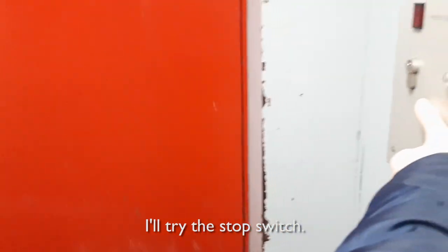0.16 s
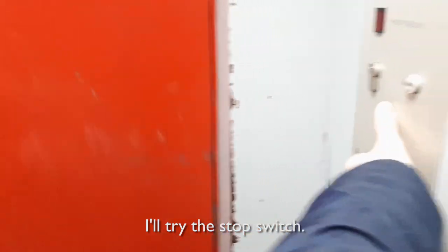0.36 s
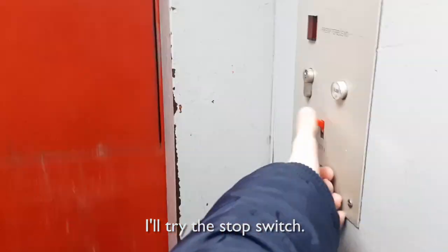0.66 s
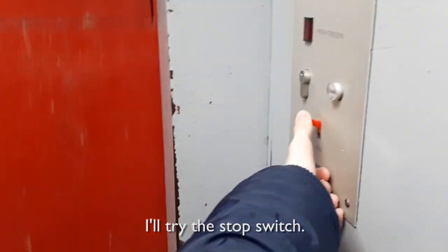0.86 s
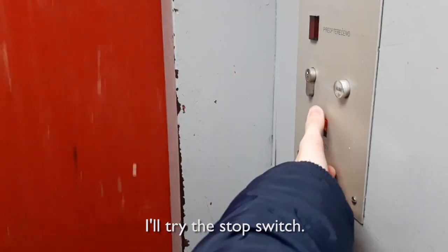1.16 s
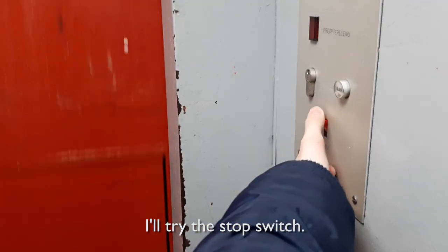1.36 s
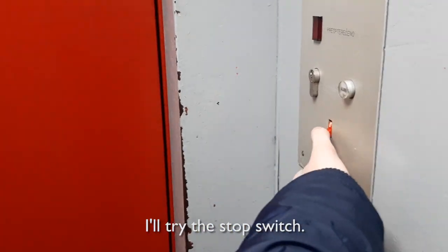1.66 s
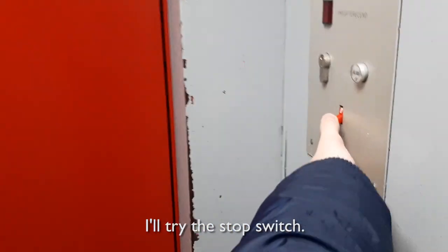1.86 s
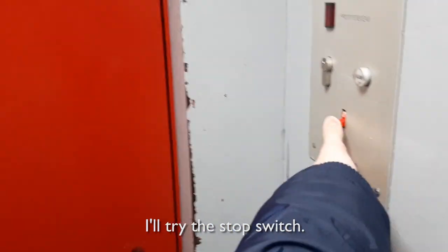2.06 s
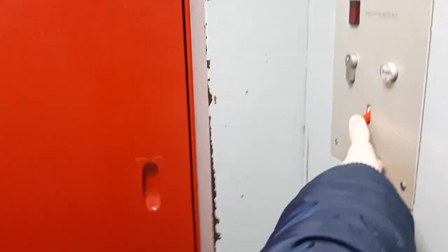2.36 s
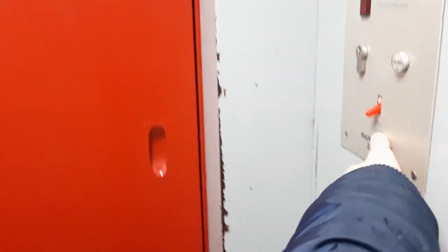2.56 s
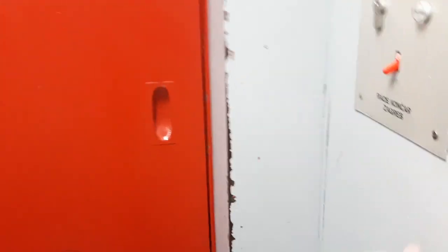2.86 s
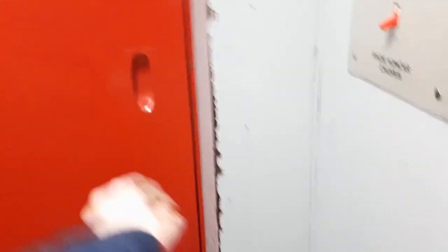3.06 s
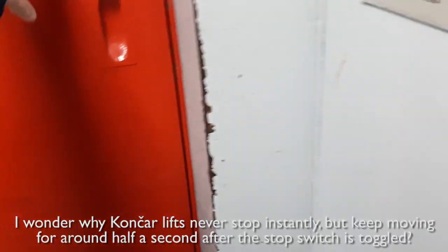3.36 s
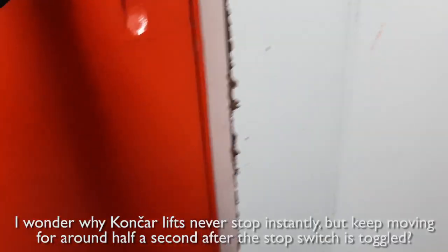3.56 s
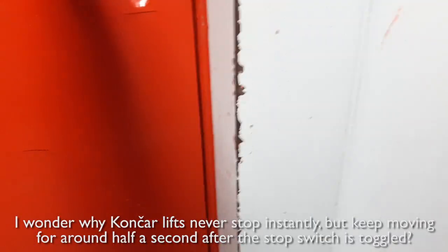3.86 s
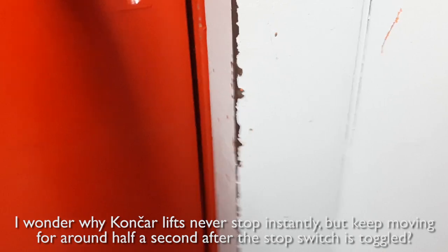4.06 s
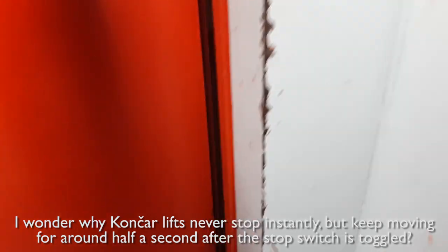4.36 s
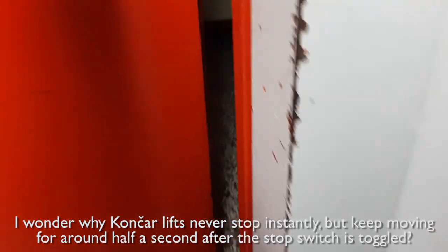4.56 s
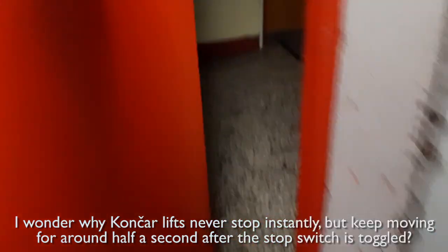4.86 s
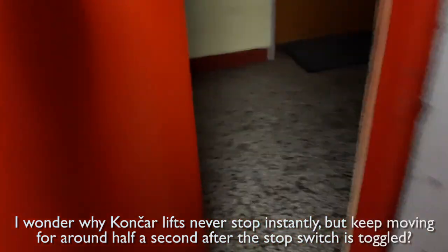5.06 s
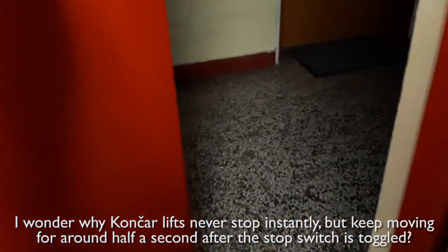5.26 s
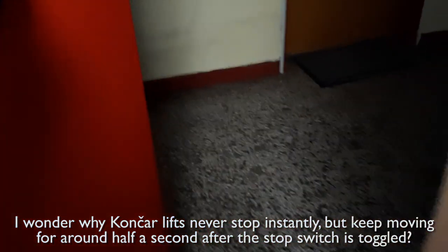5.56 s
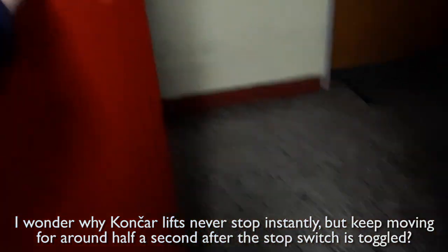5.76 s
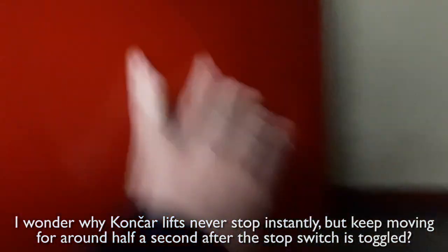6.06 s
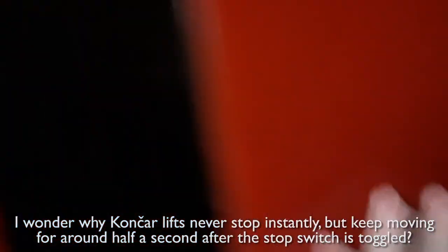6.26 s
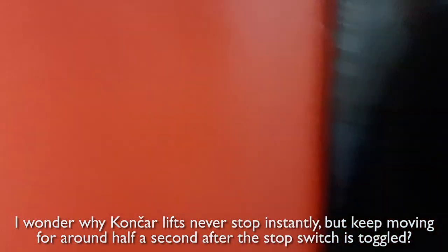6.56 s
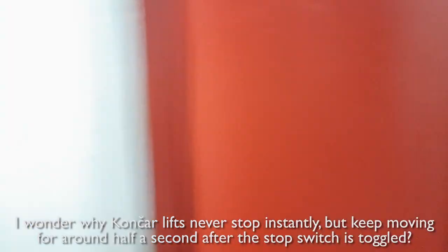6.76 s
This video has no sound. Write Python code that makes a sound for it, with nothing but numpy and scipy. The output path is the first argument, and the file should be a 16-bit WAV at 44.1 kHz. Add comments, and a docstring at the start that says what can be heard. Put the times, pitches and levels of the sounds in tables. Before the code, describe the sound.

A lift car rumbles and squeaks along its rails, stops with a burst of loud metallic clanks, then its door clunks open with a boomy ring.

```python
"""A steel lift car rumbles and drones along its rails with squeaking guide shoes; relays and brake then clank,
the car booms and settles, the landing door is pushed open and a jacket rustles.
Noise through resonances makes rumble, drone, rub and squeaks; blows are decaying noise bursts that also sound
through the shaft; sheets and door add decaying sines. A held phone hears it with two spaced microphones."""
import sys
import numpy as np
from scipy import signal
from scipy.fft import rfft, irfft
from scipy.io import wavfile

SR = 44100
rng = np.random.default_rng(int(sys.argv[2]) if len(sys.argv) > 2 else 0)


def log_audio(samples):
    """Write samples as a 16-bit WAV file to the path given in sys.argv[1]."""
    # one column per channel
    frames = np.atleast_2d(samples).T
    # limit to full scale, then quantise
    limited = np.clip(frames, -1, 1)
    pcm = np.round(limited * 32767).astype(np.int16)
    wavfile.write(sys.argv[1], SR, pcm)


N = 304290

# left-right likeness of the noise: freq_hz, likeness
LIKENESS = [(30, 0.92), (90, 0.99), (250, 1), (500, 0.89), (1200, 0.11), (4000, 0.021), (12000, 0.088)]
SPACING_S = 0.0003496  # right microphone lags
# steady shaking of the car: time_s, level_db
SHAKING = [(0, -44.5), (1.5, -44.5), (3.3, -47), (4.3, -48), (5.6, -56.5), (6.9, -54)]
# offsets over the shaking, one value each [dB]: boom, rumble, sheets, rub
STEADY_DB = [1, -3, -1, -7.5]
# jolts at their height: peak_s, boom_db, rumble_db, sheets_db, rub_db
JOLTS = [(.13, -39.5, -58, -46.5, -81), (.9, -54, -38.5, -50, -54.5), (1.78, -24, -45, -25, -27.5),
         (1.88, -27, -30, -23.5, -50), (2.02, -24.5, -31, -27, -54), (2.38, -26.5, -34.5, -72, -77),
         (2.92, -48, -35, -68, -54), (3.859, -37, -33.5, -44, -50.5), (4.491, -38, -39.5, -24, -60),
         (4.85, -39.5, -39.5, -38, -51)]
# jolt slopes, one value each [dB/s]: boom, rumble, sheets, rub
JOLT_RISE_DB_PER_S = [147, 87, 504, 90]
JOLT_FALL_DB_PER_S = [34.4, 35.6, 47, 43.3]
# air column resonances: freq_hz, width_hz, level_db
BOOM = [(90.25, 10.8, 15), (107.4, 20, -1.5)]
# deep frame resonances: freq_hz, width_hz, level_db
RUMBLE = [(39, 11.5, -5.5), (65.8, 11.6, 3), (123.3, 3.6, -2)]
# wall sheet modes: freq_hz, width_hz, level_db
SHEETS = [(163.4, 53, 4), (194.6, 28, 3), (233, 27.6, 3), (287.7, 46, 1.5), (336, 155, -2.5), (406, 30, -3),
          (501, 186, -9)]
# travel drone resonances: freq_hz, width_hz, level_db
DRONE = [(314, 75, -0.5), (508, 41, -6.5), (606, 230, -12), (790, 11, -7), (910, 100, -17)]
DRONE_DB, DRONE_END_S = -47.5, 2.13
# rail rub spectrum: freq_hz, density_db_per_hz
RUB = [(250, -11.5), (330, -13.5), (1280, -20), (3420, -28.5), (5870, -28.5), (9000, -35), (12000, -73)]
# steady jacket rustle: time_s, level_db
CLOTH = [(0, -54), (2.0, -53), (2.5, -59.5), (3.9, -53.5), (5.4, -60.5), (6.3, -50)]
# jacket rustle spectrum: freq_hz, density_db_per_hz
RUSTLE = [(600, 0), (1500, 4.5), (4000, 2.5), (8000, 0), (16000, -3.5)]
# arm sweeping past: plateau start, plateau length, level, slope either side
SWEEP_S, SWEEP_HOLD_S, SWEEP_DB, SWEEP_SLOPE_DB_PER_S = 6.607, 0.15, -41.5, 56
# scuffs of cloth and shoes: start_s, bright_db, dull_db, length_after_rise_s
SCUFFS = [(1.442, -68, -62, 0.12), (3.935, -57, -53.5, 0.12), (4.56, -44.5, -56, 0.076),
          (4.7, -52.5, -61, 0.16), (4.948, -47.5, -52, 0.079), (5.559, -40.5, -73, 0.12),
          (5.847, -54, -51, 0.25), (6.052, -55, -50.5, 0.19)]
SCUFF_RISE_S = 0.04
# bright scuff spectrum: freq_hz, density_db_per_hz
SCUFF_TONE = [(2000, -8), (5000, -3), (12000, 5)]
# guide shoe chirps: start_s, length_s, upper_db, lower_db
CHIRPS = [(.54, 0.22, -58, -63), (0.748, 0.25, -55, -58), (1.053, 0.18, -58.5, -63),
          (1.283, 0.2, -53.5, -57), (2.652, .24, -60, -71), (2.87, 0.27, -56.5, -55.5),
          (3.149, 0.3, -56, -62), (3.48, 0.22, -51, -54), (3.819, 0.21, -57.5, -60)]
# shoe tones, upper then lower: pitch_hz, width_hz
SHOE = [(5760, 140), (3393, 150)]
# thin whines: start_s, length_s, pitch_hz, level_db
WHINES = [(1.17, 0.33, 1710, -63), (2.201, 0.38, 3430, -59), (2.279, 0.34, 1670, -57.5),
          (2.819, 0.62, 1976, -52), (3.002, 0.3, 3950, -61), (2.98, 0.59, 1680, -58),
          (3.33, 0.57, 1692, -52)]
WHINE_WIDTH_HZ = 44
WAVER_SHARE, WAVERS_PER_S = .006, 9.  # squeak pitch wander: share of the pitch, steps per second
# fingers bumping the phone: start_s, length_s, level_db, centre_hz, left_right_db
BUMPS = [(0.743, 0.25, -38.5, 111, -18.5), (6.71, 0.069, -39, 84.6, 13), (6.838, 0.077, -40.5, 87, 33)]
# metal blows: start_s, clank_db, knock_re_clank_db, sizzle_re_clank_db, t60_s, ring_hz, ring_lift_db, rise_s
BLOWS = [(1.456, -50.5, 13.5, -15, 0.44, 1500, 5, 0.0058), (1.575, -13, 0.5, -9.5, 0.36, 600, -2, 0.0012),
         (1.698, 0, -18, -11, 0.14, 4900, 11, 0.0081), (1.7117, -12.5, -6.5, -30, 0.48, 4750, 5, 0.00083),
         (1.7244, -20, 1.5, -23, 0.53, 1080, 5, 0.0027), (1.808, -8.5, -1.5, -30, 0.37, 1520, 1, 0.012),
         (1.8494, -12, -4.5, -20, 0.19, 640, 7, 0.0067), (1.982, -18, 0.5, -9, 0.58, 704, -3, 0.008),
         (2.082, -7, -8, -5.5, 0.22, 2050, 7.5, 0.0086), (2.1144, -16.5, -4, -24, 0.31, 1050, 4, 0.014),
         (2.781, -45, 12, -7, 0.73, 1150, 2, 0.0055), (3.7, -35, 8.5, -31, 0.33, 1800, -4, 0.0046),
         (3.7494, -51, 19, -25, 0.24, 1510, 2, 0.0029), (4.2949, -45.5, 9, 5.5, 0.36, 1910, -8, 0.002),
         (4.382, -37, 0, -4, 0.34, 1710, -21, 0.0077), (4.4718, -18.5, 7, 2.5, 0.31, 1190, -2, 0.0019),
         (5.4844, -50, 3, -20, 0.077, 1530, 6, 0.0009), (5.913, -43.5, 9.5, -15, .12, 1530, 0, .008)]
# knock spectrum: freq_hz, density_db_per_hz
KNOCK = [(300, -10.5), (600, -4), (1200, -9.5), (2200, -7), (3500, -17.5), (9000, -48)]
# clank spectrum: freq_hz, density_db_per_hz
CLANK = [(1200, -63), (2800, 4), (5000, 4), (7500, 1.5), (11000, -5)]
# sizzle spectrum: freq_hz, density_db_per_hz
SIZZLE = [(5000, -35), (9000, -5), (12000, 8), (16000, -0.5)]
# steel parts ringing under each blow, before its lift: freq_hz, width_hz, over_clatter_db
STEEL = [(633, 77, 6), (1074, 107, 8), (1545, 115, 6), (2042, 55, 9.5), (4736, 66, 3), (6065, 50, -2)]
# reverberation of car and shaft: freq_hz, t60_s
SHAFT = [(500, 1.41), (1100, 1.74), (2900, 0.99), (7700, 0.12), (15000, 0.085)]
SHAFT_DB = -13.5
# blows that ring the sheets: start_s, level_db, centre_hz, spread_hz, t60_s
THUDS = [(1.579, -23.5, 342, 197, 0.51), (1.715, -18, 399, 40.3, 0.77), (1.81, -19.5, 224, 125, 1.7),
         (1.86, -19.5, 325, 149, 0.79), (3.702, -25, 334, 124, 0.94)]
# door leaf modes after the latch lets go: freq_hz, level_db, t60_s
DOOR = [(167, -29.5, 0.78), (232.7, -18.5, 0.68), (291.2, -14.5, .3), (257.4, -30.5, 1.62),
        (431, -27, 0.43)]
DOOR_S = 4.476
# air column swells pumped by the swinging door: peak_s, level_db
SWELLS = [(4.81, -31.5), (4.93, -30.5), (5.04, -33), (5.17, -35), (5.28, -35), (5.4, -43), (5.58, -43)]
SWELL_S = .15
# level difference as the phone turns: time_s, left_right_db
TURN = [(0, -0.5), (4.5, 0.5), (5.5, 3.5), (6.9, 1.5)]
# duller left port: freq_hz, left_right_db
BALANCE_DB = [(60, -1), (130, -2.5), (290, -4), (640, -0.5), (1410, -2.5), (3100, -3), (6820, -3.5),
              (15000, -7.5)]
# response of the sound ports: freq_hz, gain_db
PORTS = [(7000, 0), (8000, -2.5), (8700, -12.5), (10000, -5.5), (11500, -1), (14500, -2)]
# hiss rise under the band limit: freq_hz, width_hz, level_db
HISS_TOP = [(15500, 700, 31)]
HISS_DB, EDGE_HZ = -78.5, 15900


def gain_of(db):
    """Decibels to amplitude."""
    return 10 ** (np.asarray(db) / 20)


def evened(x):
    """Scales to rms 1."""
    return x / np.sqrt(np.mean(x ** 2) + 1e-20)


def read(points, hz):
    """Reads a table on a log-frequency axis."""
    f_hz, value = np.transpose(points)
    return np.interp(np.log(hz + 1), np.log(f_hz + 1), value)


def follow(rows):
    """Every column of a curve, sample by sample."""
    time_s, *columns = np.transpose(rows)
    return [np.interp(np.arange(N) / SR, time_s, c) for c in columns]


def sides(db):
    """Left and right gains for a level difference."""
    return gain_of(np.array([db / 2, -db / 2]))


def peaks(modes, hz):
    """Steep resonances, summed in power; returns amplitude."""
    return np.sqrt(sum((gain_of(db) / (1 + (2 * (hz - f_hz) / width_hz) ** 2)) ** 2
                       for f_hz, width_hz, db in modes))


def pair(shape, count):
    """Noise of spectrum shape(hz) at two spaced microphones: part shared, part independent, rms 1."""
    hz = np.fft.rfftfreq(count, 1 / SR)
    left, other = rfft(rng.standard_normal((2, count)))
    same = np.clip(read(LIKENESS, hz), -1, 1)
    lag = np.exp(-2j * np.pi * SPACING_S * hz)
    right = (same * left + np.sqrt(1 - same ** 2) * other) * lag
    return evened(irfft(np.array([left, right]) * shape(hz), count))


def flutter(per_s, db):
    """Random gain that wanders about per_s times a second."""
    steps = rng.standard_normal(2000)
    return gain_of(db * np.interp(np.arange(N) / SR * per_s, np.arange(2000), steps))


def jolting():
    """Gains of boom, rumble, sheets and rub: steady shaking plus jolts that swell fast and die slower."""
    t = np.arange(0, N + 64, 64) / SR
    rise, fall = np.array([JOLT_RISE_DB_PER_S, JOLT_FALL_DB_PER_S])[:, :, None]
    steady_db = np.interp(t, *np.transpose(SHAKING)) + np.array(STEADY_DB)[:, None]
    power = gain_of(steady_db) ** 2
    for peak_s, *db in JOLTS:
        slope_db = np.minimum(rise * (t - peak_s), fall * (peak_s - t))
        power = power + gain_of(np.array(db)[:, None] + slope_db) ** 2
    return [np.interp(np.arange(N) / SR, t, np.sqrt(p)) for p in power]


def car(boom_gain, rumble_gain, sheets_gain):
    """Random shaking drives air column, frame and wall sheets; a drone lasts while the car travels."""
    boom = boom_gain * pair(lambda hz: peaks(BOOM, hz), N)
    rumble = rumble_gain * pair(lambda hz: peaks(RUMBLE, hz), N)
    rattle = flutter(30, 2.2)
    sheets = sheets_gain * pair(lambda hz: peaks(SHEETS, hz), N) * rattle
    moving = np.clip(DRONE_END_S - np.arange(N) / SR, 0, .5) * 2  # fades over the last 0.5 s
    drone = gain_of(DRONE_DB) * moving * pair(lambda hz: peaks(DRONE, hz), N)
    return boom + rumble + sheets + drone


def sliding(rub_gain):
    """Friction noise: broad rail rub and brighter, grainy cloth, with short scuffs in both."""
    t = np.arange(N) / SR
    away_s = np.maximum(np.maximum(SWEEP_S - t, t - SWEEP_S - SWEEP_HOLD_S), 0)
    sweep_gain = gain_of(SWEEP_DB - SWEEP_SLOPE_DB_PER_S * away_s)
    cloth_gain = np.hypot(gain_of(follow(CLOTH)[0]), sweep_gain)
    scuff_gain = np.zeros(N)
    for start_s, bright_db, dull_db, length_s in SCUFFS:
        onset = (t - start_s) / SCUFF_RISE_S
        release = (start_s + SCUFF_RISE_S + length_s - t) / length_s * 1.26
        stroke = np.clip(np.minimum(onset, release), 0, 1)
        rub_gain = rub_gain + gain_of(dull_db) * stroke
        scuff_gain = scuff_gain + gain_of(bright_db) * stroke
    rub = rub_gain * pair(lambda hz: gain_of(read(RUB, hz)), N) * flutter(40, 1.04)
    cloth = cloth_gain * pair(lambda hz: gain_of(read(RUSTLE, hz)), N)
    scuff = scuff_gain * pair(lambda hz: gain_of(read(SCUFF_TONE, hz)), N)
    return rub + (cloth + scuff) * flutter(150, 0.86)


def squeaks():
    """Stick-slip chirps and whines: noise in narrow, wavering resonances, quick to start, slower to fade."""
    out, t = np.zeros((2, N)), np.arange(N) / SR
    tones = [(start_s, length_s, f_hz, width_hz, db) for start_s, length_s, *levels in CHIRPS
             for (f_hz, width_hz), db in zip(SHOE, levels)]
    tones += [(start_s, length_s, f_hz, WHINE_WIDTH_HZ, db) for start_s, length_s, f_hz, db in WHINES]
    wander = WAVER_SHARE * np.interp(t * WAVERS_PER_S, np.arange(200), rng.standard_normal(200))
    for start_s, length_s, f_hz, width_hz, db in tones:
        start = round(start_s * SR)
        u = np.linspace(0, 1, round(length_s * SR))
        noise = pair(lambda hz: peaks([(f_hz, width_hz, 0)], hz), count=32768)
        steady = signal.hilbert(noise)[:, :len(u)]
        bend = np.exp(2j * np.pi * f_hz * np.cumsum(wander[start:][:len(u)]) / SR)
        tone = evened((steady * bend).real)
        swing = np.minimum(u / 0.13, 1) * np.minimum((1 - u) / 0.7, 1)
        out[:, start:][:, :len(u)] += gain_of(db) * tone * swing
    return out


def bumps():
    """Finger bumps: soft low noise lumps, each stronger at one microphone."""
    out = np.zeros((2, N + SR))
    for start_s, length_s, db, centre_hz, pan_db in BUMPS:
        swell = np.hanning(round(length_s * SR))
        noise = pair(lambda hz: peaks([(centre_hz, 0.88 * centre_hz, 0)], hz)
                     * np.minimum(hz / centre_hz, 1) ** 2, SR)
        lump = evened(noise[:, :len(swell)])
        out[:, round(start_s * SR):][:, :len(swell)] += gain_of(db) * lump * swell * sides(pan_db)[:, None]
    return out[:, :N]


def blows():
    """Metal blows: clatter coloured by ringing steel, each with its own rise and decay."""
    out, t = np.zeros((2, N + SR)), np.arange(SR // 2) / SR
    for start_s, db, knock_db, sizzle_db, t60_s, ring_hz, lift_db, rise_s in BLOWS:
        # parts near the blow's own pitch stand out most
        steel = [(f_hz, width_hz, level + lift_db - 8 * min((np.log(f_hz / ring_hz) / 0.35) ** 2, 1))
                 for f_hz, width_hz, level in STEEL]
        clank, sizzle = (pair(lambda hz: gain_of(read(part, hz)) * (1 + peaks(steel, hz)), len(t))
                         for part in (CLANK, SIZZLE))
        # the duller knock gathers round the same pitch, up to 2 kHz
        knock_hz = min(ring_hz, 2000)
        knock = pair(lambda hz: gain_of(read(KNOCK, hz) - 2.2 * np.log((hz + 1) / knock_hz) ** 2)
                     * (1 + peaks(steel, hz)), len(t))
        clatter = clank + gain_of(knock_db) * knock + gain_of(sizzle_db) * sizzle
        # a hard millisecond crack sits on the longer clatter
        fall = 0.43 * gain_of(-60 * t / max(t60_s, .01)) + 1.94 * np.exp(-t / 0.0014)
        swing = gain_of(db) * (1 - np.exp(-t / max(rise_s, 1e-4))) * fall
        out[:, round(start_s * SR):][:, :len(t)] += clatter * swing
    return out[:, :N] * flutter(250, 1.9)  # loose parts rattle


def shaft(x):
    """Dense reflections in car and shaft: convolution with noise, each band dying at its own speed."""
    hz, t, z = signal.stft(rng.standard_normal((2, SR)), SR, nperseg=256)
    decay = gain_of(-60 * t / read(SHAFT, hz)[:, None])
    tail = signal.istft(z * decay, SR, nperseg=256)[1]
    return signal.fftconvolve(x, tail / np.linalg.norm(tail[0]), axes=1)[:, :N]


def thuds():
    """Blows ring the sheet modes near their centre, part cleanly, part as a rough shudder."""
    out, t = np.zeros((2, N + SR)), np.arange(SR) / SR
    for start_s, db, centre_hz, spread_hz, t60_s in THUDS:
        struck = [(f_hz, width_hz, level - 6 * ((f_hz - centre_hz) / spread_hz) ** 2)
                  for f_hz, width_hz, level in SHEETS]
        ring = sum(gain_of(level) * np.sin(2 * np.pi * (f_hz * t + rng.random()))
                   for f_hz, _, level in struck)
        shudder = pair(lambda hz: peaks(struck, hz), SR)
        swing = gain_of(db - 60 * t / t60_s) * (1 - np.exp(-t / 0.009))
        out[:, round(start_s * SR):][:, :SR] += swing * (0.51 * evened(ring) + 0.78 * shudder)
    return out[:, :N]


def door():
    """The leaf's modes ring out slightly rough; then the swinging door makes the air column swell."""
    out, t = np.zeros((2, N)), np.arange(N - round(DOOR_S * SR)) / SR
    for f_hz, db, t60_s in DOOR:
        rough = pair(lambda hz: peaks([(f_hz, 22, 0)], hz), len(t))
        ring = 1.16 * np.sin(2 * np.pi * (f_hz * t + rng.random())) + 0.67 * rough
        out[:, -len(t):] += gain_of(db - 60 * t / t60_s) * (1 - np.exp(-t / 0.0057)) * ring
    t = np.arange(N) / SR
    boom_hz = BOOM[0][0]
    for peak_s, db in SWELLS:
        swell = np.cos(np.pi * np.clip((t - peak_s) / SWELL_S, -.5, .5)) ** 2
        out += gain_of(db) * swell * np.sin(2 * np.pi * (boom_hz * t + rng.random()))
    return out


def scene():
    """Sums the sources; blows also sound through the shaft, bumps bypass the phone's turn."""
    boom_gain, rumble_gain, sheets_gain, rub_gain = jolting()
    hits = blows()
    around = car(boom_gain, rumble_gain, sheets_gain) + sliding(rub_gain) + squeaks()
    around += hits + gain_of(SHAFT_DB) * shaft(hits) + thuds() + door()
    return around * sides(follow(TURN)[0]) + bumps()


def record(dry):
    """Microphone hiss, the sound ports' dip near 9 kHz, soft overload, then the band limit."""
    hz = np.fft.rfftfreq(N, 1 / SR)
    hiss = gain_of(HISS_DB) * rfft(rng.standard_normal(dry.shape)) * (1 + peaks(HISS_TOP, hz))
    response = gain_of(read(PORTS, hz)) * sides(read(BALANCE_DB, hz))
    heard = irfft((rfft(dry) + hiss) * response, N)
    lowpass = signal.firwin(511, EDGE_HZ, window=("kaiser", 9), fs=SR)
    return signal.oaconvolve(np.tanh(heard), lowpass[None], "same")


dry = scene()
out = record(dry)
log_audio(out)
```